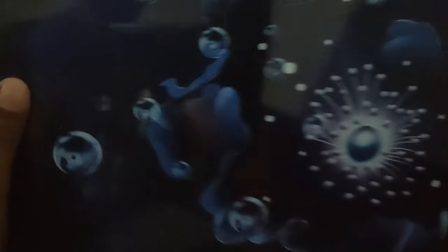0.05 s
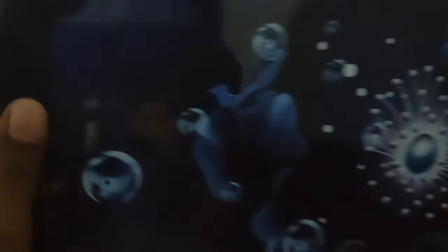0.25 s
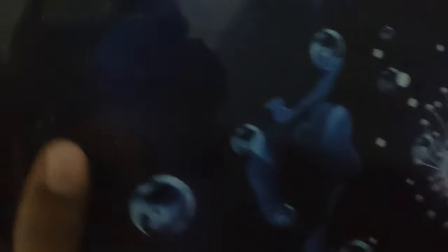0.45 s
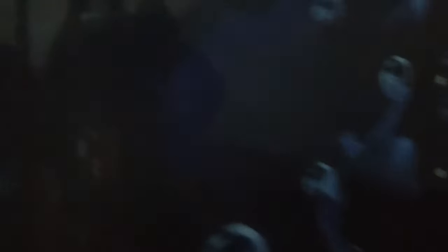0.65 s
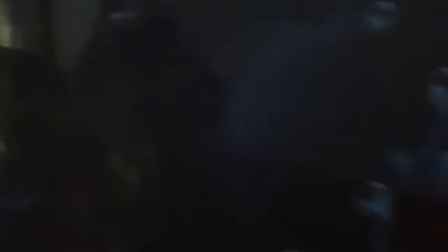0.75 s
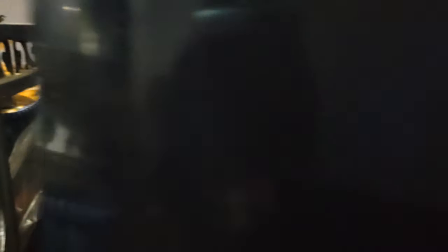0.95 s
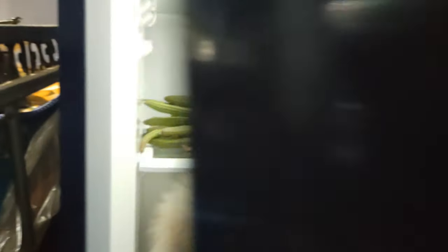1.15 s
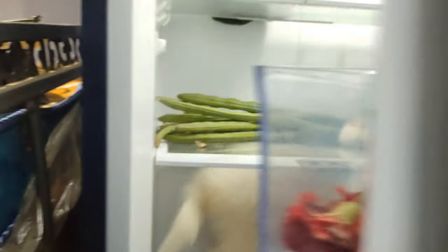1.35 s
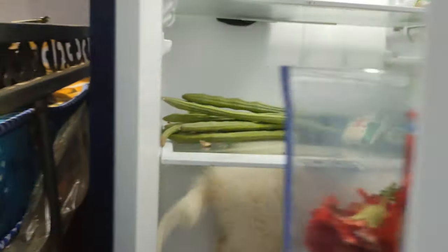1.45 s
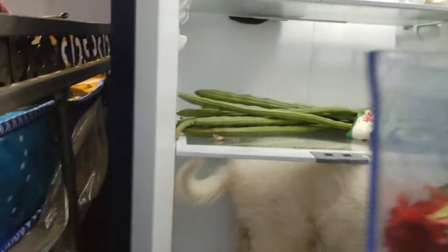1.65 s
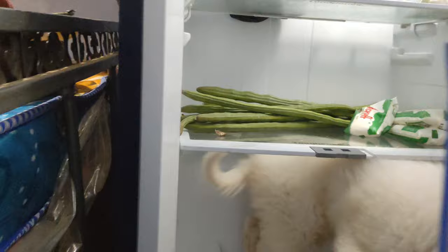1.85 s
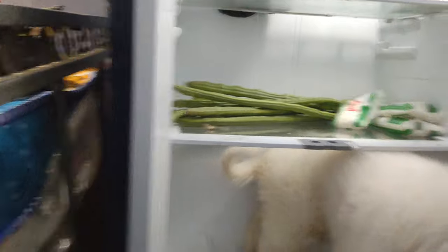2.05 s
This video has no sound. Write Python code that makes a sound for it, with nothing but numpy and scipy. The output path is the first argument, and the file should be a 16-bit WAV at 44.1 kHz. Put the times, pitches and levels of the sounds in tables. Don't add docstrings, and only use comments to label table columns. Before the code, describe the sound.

A refrigerator door opens, heard close up in a small kitchen with a short echo. Effort builds from 0.1 s; the rubber seal scrapes and peels at 0.2 s, with heavy hollow thuds around 0.32 and 0.38 s ringing low. At 0.84 s a sharp plastic crack rattles briefly. Soft shifting at 1.35 s, a click and bump near 1.6 s, packet rustle at 1.85 s, over quiet compressor hum, slightly louder once open.

```python
import sys
import numpy as np
from scipy import signal
from scipy.fft import rfft, irfft, next_fast_len
from scipy.io import wavfile
from scipy.ndimage import uniform_filter1d

SR = 44100
rng = np.random.default_rng(int(sys.argv[2]) if len(sys.argv) > 2 else 0)


def voltage_ratio(level):
    return 10 ** (np.asarray(level, float) / 20)


def file_out(sig):
    cols = np.atleast_2d(sig).T
    lim = np.clip(cols, -1, 1)
    pcm = np.round(lim * 32767).astype(np.int16)
    wavfile.write(sys.argv[1], SR, pcm)


N = 92610
t = np.arange(N) / SR

SHAFT_HZ, HUM_WOBBLE_DB, HUM_OPEN_DB, OPENS_S = 48.86, 3.5, 3.5, 1.48
AIR_DB, MIC_DB, HAND_DB, HAND_HZ = -58.5, -93, -68, 38
GRAIN_DB, SWELL_SHARE, PEEL_WET_DB = -3.2, .5, -15.5
SPREAD_DB, SPREAD_HZ = -5, 6000
SNAP_S, SNAP_DB, SNAP_RING_DB, SNAP_WET_DB = .8438, -24.5, -40.5, -3.5
SMEAR_S_PER_HZ, RATTLE_WIDTH_HZ = 2.5e-7, 110
PORT_LAG_S, PAN_DB, PAN_HZ = 16 / SR, 10, 2600
ROOM_ALIKE = 0.16
TOP_HZ = 15300

# multiple of shaft rate, level/dB
HUM_LINES = [(1, -63.5), (2.2, -71), (3, -61), (4, -68.5), (5, -58), (6, -74), (20, -88.5), (8.6, -82.5)]
# f/Hz, width/Hz, level/dB
PIPE_WHINE = [(2090, 90, -89), (2620, 90, -83), (7480, 500, -82), (11750, 200, -95)]
# f/Hz, level/dB
AIR_SPECTRUM = [(30, -8), (60, -3.5), (260, -8), (360, -26), (620, -29.5), (1300, -30), (2600, -32),
                (5000, -41)]
# t/s, level/dB
CABINET_HISS = [
    (0, -103),
    (1.3, -74),
    (1.39, -64),
    (1.55, -64),
    (1.7, -75),
    (2.1, -70),
]
# t60/s, top of band/Hz
ROOM_BANDS = [(0.35, 1450), (0.44, 2600), (0.33, 10000)]
# t/s, length/s, level/dB, f/Hz, width/Hz
RUSTLE_BURSTS = [(1.829, 0.003, -60, 4000, 6000), (1.845, 0.035, -59, 4030, 8140),
                 (1.853, .005, -46, 3150, 400), (1.867, .005, -56, 2700, 1800),
                 (1.911, .008, -60, 5800, 1200), (1.945, .03, -64, 5500, 6000),
                 (1.858, 0.007, -56, 3140, 695), (1.852, 0.018, -55, 1890, 1200),
                 (1.911, 0.0086, -60.5, 2220, 400), (1.913, 0.017, -61.5, 3060, 500),
                 (1.911, 0.01, -59, 7400, 9200), (2.085, 0.04, -62, 900, 1500),
                 (2.085, .04, -64, 9000, 9000)]
# t/s, f/Hz, level/dB, t60/s
KNOCK_RINGS = [
    (1.8283, 1400, -44, .03),
    (1.8283, 800, -44, .03),
    (.8444, 770, -38, .07),
    (.8444, 2640, -35, .04),
    (.2965, 2000, -41, .025),
    (.3762, 2050, -43, .02),
    (.3762, 500, -38, .06),
]
# t after contact/s, level/dB
SNAP_REBOUNDS = [(.0008, 0), (.0027, -4), (.0043, -3), (.0056, -3), (.0092, -9), (.0135, -10), (.0205, -9),
                 (.0296, -10), (.0455, -13), (.056, -14)]
# f/Hz, width/Hz, level/dB
CRACK_BODY = [(270, 120, -6), (490, 80, -13), (770, 150, -3), (1150, 400, -17), (1900, 600, -3),
              (2600, 500, -1), (3100, 450, -8), (4900, 1000, -16), (6600, 1500, -25), (10000, 6000, -34)]
# f/Hz, level/dB, t60/s
RATTLE_MODES = [(490, -13, 0.3), (755, -6, 0.16), (1750, -14, 0.45), (1980, -11, 0.3), (2110, -13, 0.35),
                (2400, -17, 0.4), (2500, -17, .3), (2635, -14, 0.3), (2830, -14, 0.25), (2965, -14, 0.2),
                (3150, -21, .3), (1150, -21, .2), (4840, -27, .2), (5250, -25, .1)]
# t/s, rumble/dB, scrape/dB
SWING_EFFORT = [
    (1.31, -70, -87),
    (1.36, -52.5, -67),
    (1.46, -68, -81),
    (1.57, -59.5, -68),
    (1.64, -49.5, -77.5),
    (1.72, -65, -92),
    (1.86, -61, -83),
    (2.11, -73.5, -88),
]
# t/s, rumble/dB, scrape/dB
PULL_EFFORT = [
    (0, -61.5, -76),
    (.085, -53.5, -67),
    (.115, -45.5, -56),
    (.18, -57, -58),
    (.235, -40.5, -50.5),
    (.33, -44, -55),
    (.39, -43, -59),
    (.45, -46.5, -69.5),
    (.53, -70.5, -88.5),
]
# t/s, length/s, level/dB, f/Hz, width/Hz
PEEL_BURSTS = [(.091, 0.006, -55, 1200, 1600), (.112, 0.021, -55, 780, 2370), (.13, 0.21, -62, 5200, 9000),
               (.1545, .003, -43, 12500, 6000), (.155, 0.0034, -50, 2800, 2500),
               (.2, 0.027, -42.5, 7600, 7000), (.212, 0.036, -48.5, 7000, 10000),
               (.21, 0.033, -49.5, 1140, 2500), (.18, 0.05, -54, 6800, 5940),
               (.2955, .008, -41, 1800, 2000), (.299, .012, -56, 5000, 5000), (.116, .004, -57, 4500, 4000),
               (.205, .008, -48, 12000, 3000), (.222, .012, -47, 8500, 3000), (.4, .05, -57, 2300, 900),
               (.366, 0.024, -55, 2200, 2520), (.376, 0.012, -43.5, 2000, 1400),
               (.377, .008, -53, 5000, 2500), (.372, 0.031, -39, 536, 616), (1.346, 0.021, -53.5, 885, 770),
               (1.375, 0.025, -58, 550, 500), (1.578, 0.004, -47, 3100, 700), (1.582, .005, -45, 2950, 700),
               (1.588, .005, -50, 3000, 600), (1.578, 0.009, -54, 5300, 700),
               (1.578, .014, -53, 11500, 6000), (1.59, .05, -65, 10000, 8000), (1.578, .012, -58, 900, 900),
               (1.585, 0.05, -56, 2500, 2200), (1.608, .012, -54, 2000, 1600),
               (1.61, 0.021, -60.5, 585, 600)]
# t/s, f/Hz, level/dB, rise/s, t60/s
PANEL_BLOWS = [(0.01, 50, -46, .02, .3), (.17, 118, -46, .015, .15), (1.33, 170, -52, .015, .15),
               (.0, 93, -41.5, 0.013, 0.2), (0.103, 177.5, -40, 0.0081, 0.28),
               (0.132, 62, -41, 0.017, 0.23), (.208, 285.7, -35.5, 0.0094, 0.32),
               (.228, 235, -27.5, .008, .08), (0.227, 80, -36.5, 0.0088, 0.34),
               (0.23, 127, -33, 0.012, 0.28), (0.301, 333, -43, .02, 0.21), (0.321, 127, -22, 0.011, 0.71),
               (0.371, 89.2, -25, 0.037, 0.18), (.372, 246, -27.5, 0.0077, 0.13),
               (.375, 391, -37, 0.0024, 0.11), (0.376, 127.8, -20.5, 0.019, 0.31),
               (.385, 206.6, -36.5, 0.0066, 0.16), (0.461, 127.6, -28.5, 0.042, 0.27),
               (0.479, 86.6, -40.5, 0.018, 0.57), (0.569, 124.2, -39, 0.017, 1),
               (1.31, 142.6, -60, 0.022, 0.26), (0.889, 280.3, -45, 0.016, 0.16),
               (1.119, 71.6, -47.5, 0.01, 0.21), (1.61, 288.5, -42, 0.0096, 0.12),
               (1.625, 138.4, -37.5, 0.0042, .35), (1.64, 89.4, -43, 0.017, 0.28),
               (1.837, 73, -39.5, 0.0064, 0.15)]
RING_STOPS = [.369, 0.429, 0.737]


def unit(x):
    return x / np.sqrt(np.mean(x ** 2))


def decay(u, t60_s):
    return np.exp(-np.log(1000) * u / t60_s)


def shape(x, gain):
    n = x.shape[-1]
    size = next_fast_len(n + 4096)
    hz = np.arange(size // 2 + 1) * SR / size + 1
    return irfft(rfft(x, size) * gain(hz), size)[..., :n]


def colour(table):
    f, db = np.array(table).T
    return lambda hz: voltage_ratio(np.interp(np.log(hz), np.log(f), db))


def band(centre_hz, width_hz):
    return lambda hz: 1 / (1 + ((hz - centre_hz ** 2 / hz) / width_hz) ** 2)


def walk(rate_hz):
    k = int(SR / rate_hz)
    steps = np.repeat(rng.standard_normal(N // k + 1), k)
    return 1.09 * uniform_filter1d(uniform_filter1d(steps, k), k)[:N]


def ports(x, side, pan_db):
    def port(s):
        def gain(hz):
            lead = np.exp(1j * np.pi * hz * s * side * PORT_LAG_S)
            return lead * voltage_ratio(s * pan_db / 2 * band(PAN_HZ, 6000)(hz))
        return gain
    return np.array([shape(x, port(0.91)), shape(x, port(-1.248))])


def room(x, side, wet_db):
    u = t[:SR // 2]
    noise = rng.standard_normal((3, SR // 2))
    onset = 1 - np.exp(-u / 0.0019)
    tail, below = 0, 0
    for t60_s, top_hz in ROOM_BANDS:
        low = shape(noise, lambda hz: 1 / (1 + (hz / top_hz) ** 6))
        tail = tail + (low - below) * decay(u, t60_s) * onset
        below = low
    tail = tail / np.sqrt(np.sum(tail[0] ** 2))
    wet = signal.fftconvolve(x[None], tail, axes=1)[:, :N] * voltage_ratio(wet_db)
    shared = x + np.sqrt(ROOM_ALIKE) * wet[0]
    return ports(shared, side, PAN_DB) + np.sqrt(1 - ROOM_ALIKE) * wet[1:]


def air():
    n = rng.standard_normal((7, N))
    diffuse = shape(n[1:3], lambda hz: hz / (hz + 400) + 1500 / (hz ** 2 + 900))
    floor = shape(ports(n[0], 0.93, 5.7) + diffuse, colour(AIR_SPECTRUM))
    floor = voltage_ratio(AIR_DB + 1.1 * walk(6)) * unit(floor)
    cold = shape(n[3] + 2.4 * n[5:], lambda hz: band(2500, 1500)(hz) + 0.3 * band(12000, 9000)(hz))
    cold = unit(cold) * voltage_ratio(np.interp(t, *np.array(CABINET_HISS).T) + 0.5 * walk(24.25))
    return floor + cold + voltage_ratio(MIC_DB) * np.array([n[4], n[1]])


def compressor():
    phase = 2 * np.pi * np.cumsum(SHAFT_HZ * (1 + 0.0029 * walk(3.68))) / SR
    opened_db = HUM_OPEN_DB / (1 + np.exp(-(t - OPENS_S) / .08))
    hum, whine = np.zeros(N), np.zeros(N)
    for k, db in HUM_LINES:
        level = voltage_ratio(db + opened_db + HUM_WOBBLE_DB * walk(11.02))
        hum += level * np.sin(k * phase + rng.uniform(0, 4.93))
    for hz, width_hz, db in PIPE_WHINE:
        whine += voltage_ratio(db) * unit(shape(rng.standard_normal(N), band(hz, width_hz)))
    return 2 ** .5 * hum + ports(whine, 0.94, 2)


def hand():
    return voltage_ratio(HAND_DB) * unit(shape(rng.standard_normal((2, N)), band(HAND_HZ, 22)))


def knocks(rows):
    out = np.zeros(N)
    for s, hz, db, t60_s in rows:
        u = np.maximum(t - s, 0)
        out += voltage_ratio(db) * decay(u, t60_s) * np.sin(2 * np.pi * hz * u)
    return out


def crackle(table):
    out, u = np.zeros(N), t[:SR // 5]
    for s, length_s, db, hz, width_hz in table:
        i = int(s * SR)
        grain = np.repeat(rng.standard_normal(len(u) // 40 + 1), 40)[:len(u)]
        n = rng.standard_normal(len(u)) * voltage_ratio(GRAIN_DB * grain)
        attack_s = 0.0011 + SWELL_SHARE * max(length_s - .033, 0)
        release = np.exp(-np.maximum(u - length_s / 2, 0) / (.5 * length_s))
        env = np.minimum(u / attack_s, 1) * release
        x = shape(env * n, lambda f: 1 / (1 + 1j * (f - hz ** 2 / f) / width_hz) ** 2)
        out[i:i + len(u)] += (voltage_ratio(db) * unit(x) * np.sqrt(np.mean(env ** 2)))[:N - i]
    return out


def snap():
    hits = np.zeros(N)
    for s, db in SNAP_REBOUNDS:
        hits[int((SNAP_S + s) * SR)] = voltage_ratio(db)

    def body(f):
        power = sum((voltage_ratio(db) * band(hz, width_hz)(f)) ** 2 for hz, width_hz, db in CRACK_BODY)
        return np.sqrt(power) * np.exp(-1j * np.pi * SMEAR_S_PER_HZ * f ** 2)
    crack = shape(hits, body)
    u, ring = np.maximum(t - SNAP_S, 0), np.zeros(N)
    for hz, db, t60_s in RATTLE_MODES:
        mode = unit(shape(rng.standard_normal(N), band(hz, RATTLE_WIDTH_HZ)))
        ring += voltage_ratio(db) * decay(u, t60_s) * mode
    return voltage_ratio(SNAP_DB) * crack / crack.max() + voltage_ratio(SNAP_RING_DB) * ring * np.minimum(u / .002, 1)


def drag(effort):
    def slips(rate_hz):
        hit = rng.random(N) < rate_hz / SR
        return hit * rng.standard_normal(N) * voltage_ratio(rng.standard_normal(N))

    def level(db):
        return voltage_ratio(np.interp(t, s, db, left=-120, right=-120))
    s, rumble_db, scrape_db = np.array(effort).T
    rumble = shape(slips(500), lambda hz: (band(260, 260)(hz) + 1.8 * band(90, 80)(hz)
                                           + 0.03 * band(450, 200)(hz)))
    scrape = shape(slips(1500), lambda hz: band(800, 200)(hz) + 0.21 * band(2200, 2500)(hz))
    return level(rumble_db) * unit(rumble) + level(scrape_db) * unit(scrape)


def seal_spread():
    x = shape(crackle(PEEL_BURSTS), lambda hz: 1 / (1 + (SPREAD_HZ / hz) ** 4))
    return voltage_ratio(SPREAD_DB) * np.array([x, -x])


def panel():
    out = np.zeros(N)
    for s, hz, db, rise_s, t60_s in PANEL_BLOWS:
        u = np.maximum(t - s, 0)
        swell = np.sin(np.pi / 2 * np.minimum(u / rise_s, 1)) ** 2
        env = swell * decay(np.maximum(u - rise_s, 0), t60_s)
        later = [c for c in RING_STOPS if c > s and 100 < hz < 150]
        if later:
            env = env / (1 + np.exp(np.clip((t - later[0]) / 0.0069, -50, 50)))
        out += voltage_ratio(db) * env * np.sin(2 * np.pi * hz * u)
    return 2 ** .5 * out


def scene():
    background = air() + compressor() + hand()
    packets = room(crackle(RUSTLE_BURSTS), -0.913, -14) + room(knocks(KNOCK_RINGS[:2]), -0.3, -16)
    shelf = room(snap(), 0.9, SNAP_WET_DB)
    effort = room(drag(SWING_EFFORT), 1.0, -7) + room(drag(PULL_EFFORT), 0.41, -11)
    seal = seal_spread() + room(crackle(PEEL_BURSTS) + knocks(KNOCK_RINGS[2:]), 0.876, PEEL_WET_DB)
    return background + packets + shelf + effort + seal + room(panel(), 0.6, -19)


def roll_off(x):
    return signal.sosfilt(signal.butter(12, 15640, fs=SR, output="sos"), x)


def record(dry):
    x = signal.sosfilt(signal.ellip(8, .2, 70, TOP_HZ, fs=SR, output="sos"), dry)
    x = signal.sosfilt(signal.butter(2, 40, "high", fs=SR, output="sos"), x)
    return roll_off(x)


dry = scene()
out = record(dry)
file_out(out)
```